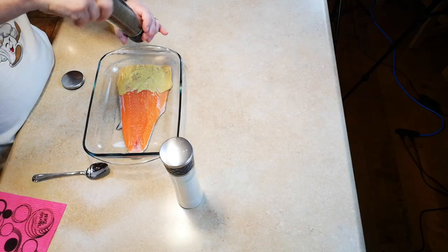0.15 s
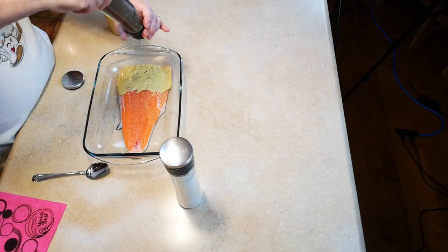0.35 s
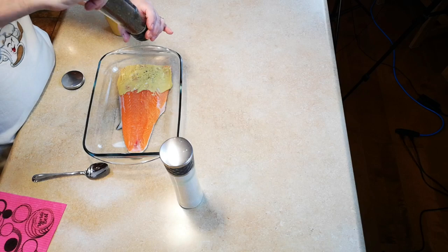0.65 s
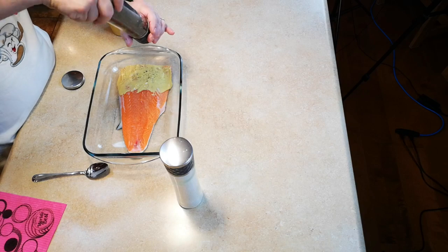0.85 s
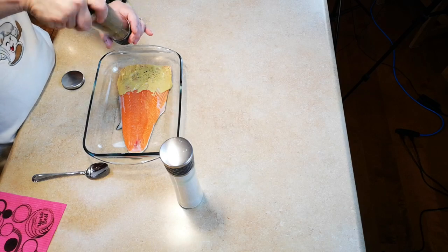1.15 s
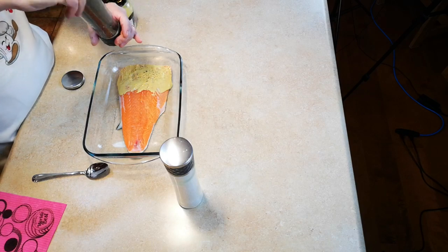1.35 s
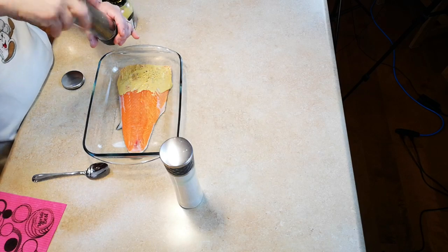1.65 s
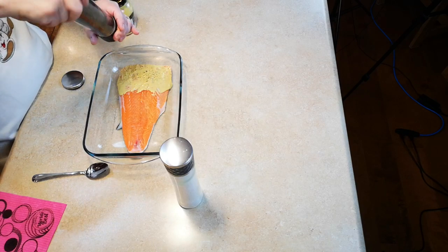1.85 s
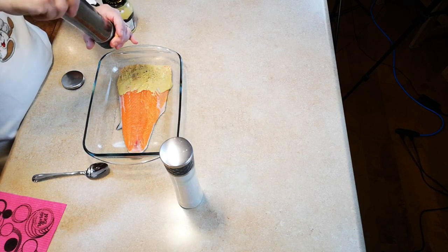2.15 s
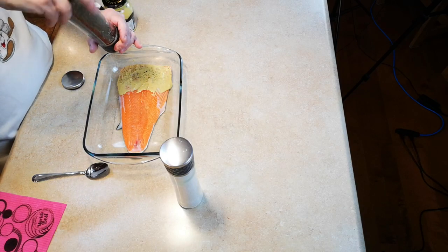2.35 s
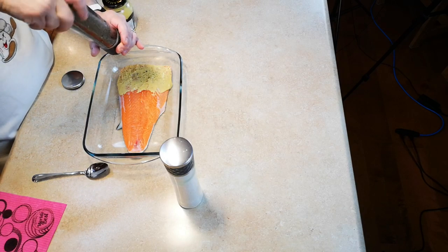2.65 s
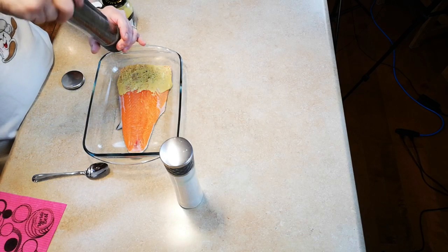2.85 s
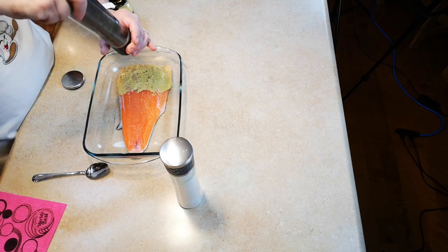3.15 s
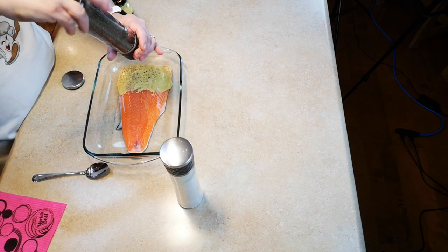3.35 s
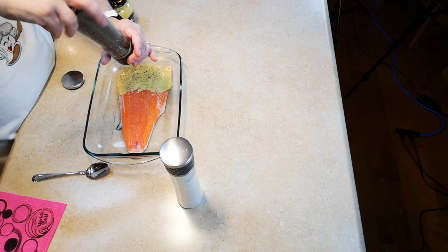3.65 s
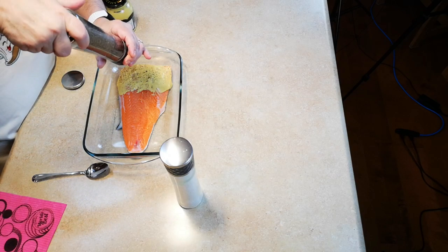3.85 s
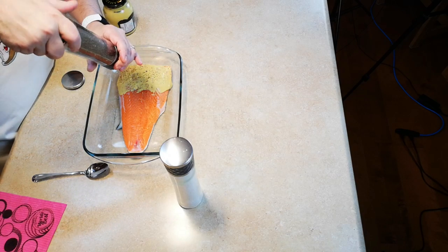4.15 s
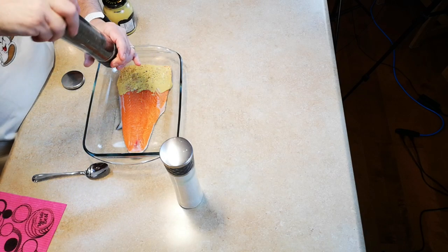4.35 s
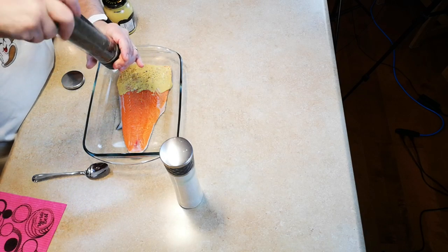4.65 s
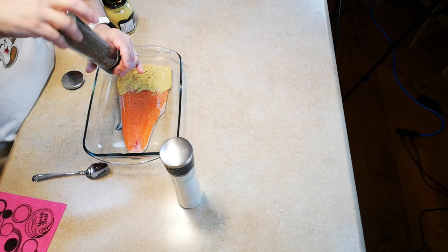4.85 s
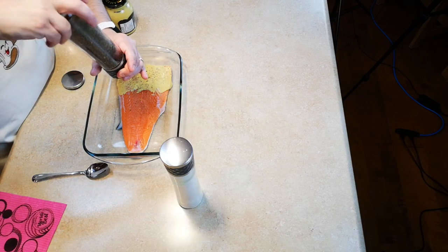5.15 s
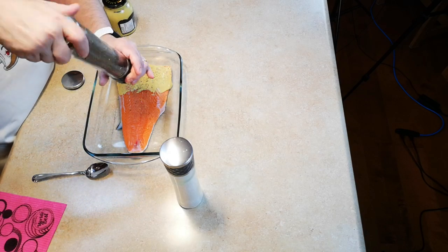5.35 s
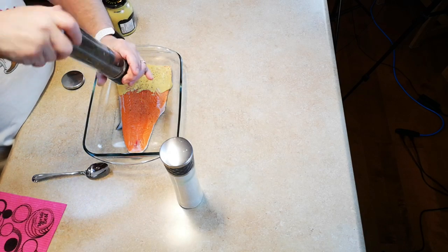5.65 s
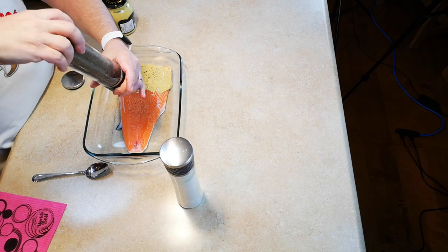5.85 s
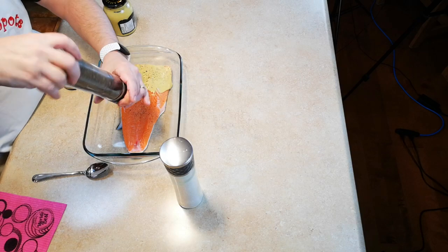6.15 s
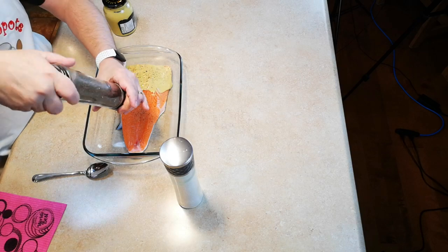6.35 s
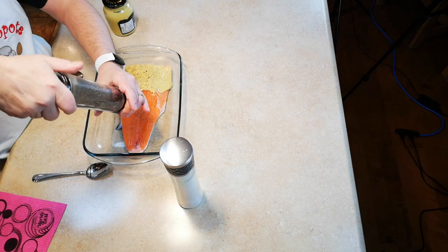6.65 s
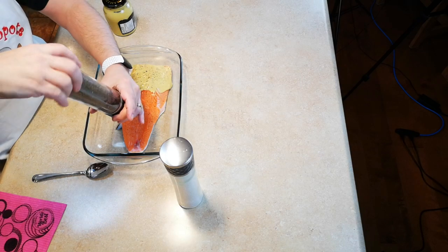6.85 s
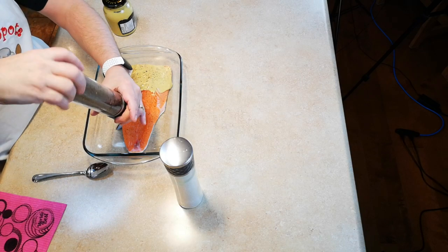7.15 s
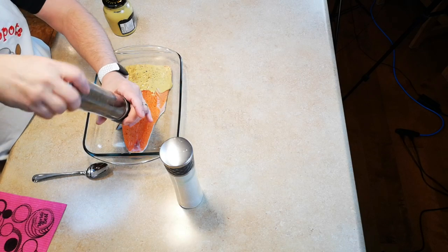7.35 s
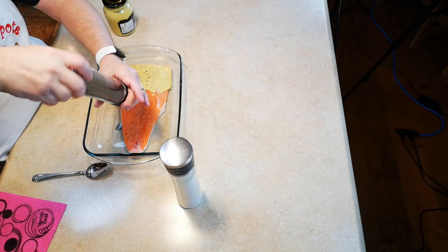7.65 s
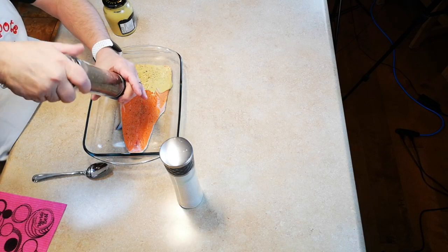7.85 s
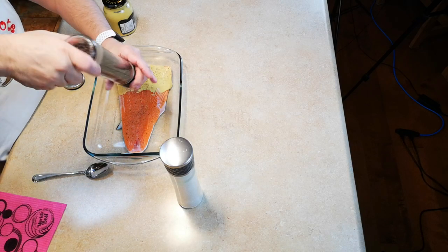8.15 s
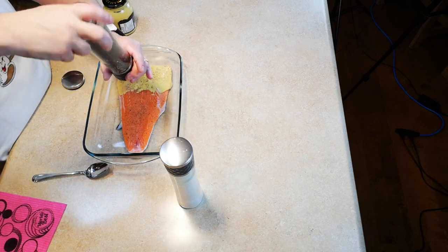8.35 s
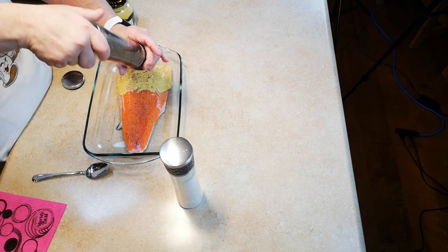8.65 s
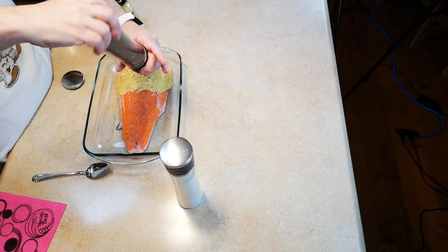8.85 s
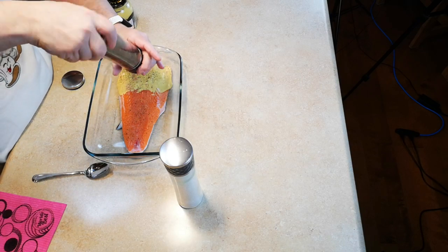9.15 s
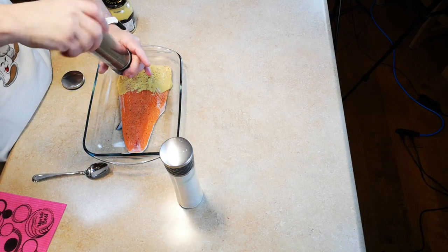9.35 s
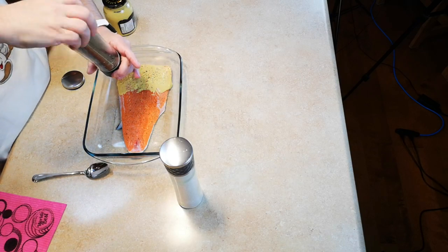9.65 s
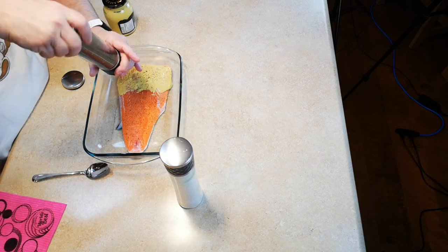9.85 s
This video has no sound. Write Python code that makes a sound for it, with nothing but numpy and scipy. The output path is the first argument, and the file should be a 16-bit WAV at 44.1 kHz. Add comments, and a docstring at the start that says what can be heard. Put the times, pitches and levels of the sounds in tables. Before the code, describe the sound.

Close up in a quiet kitchen, a hand-twisted pepper mill crunches immediately, over a faint deep rumble. From 0 to about 5 seconds short gritty turns, each under a tenth of a second, come nearly three a second, speeding slightly. They crack in a hollow mid-to-high body ring, wrapped in fine bright rattling of loose corns. Faint, tiny shaft squeaks touch 0.3, 1.1 and 3.5 seconds; a hard snap lands at 1.1. From 5 seconds the turns double to about six a second, alternating strong and weak, with strong cracks around 6.3, 6.6 and 7.2 and soft dull hand thumps between 5 and 7.4. Around 8.2 to 8.5 the grinding pauses for a grip shift and small rattle. A very sharp crack at 8.6 restarts it; uneven crunches and thin ticks continue to 10 seconds, with only short, sparse echoes.

```python
"""The burr of a hand-twisted pepper mill crunches at once, over a low kitchen rumble.
Its short turns, about three a second and later about six, are cracks ringing in the mill body.
Loose corns rattle and tick as fine noise grains in a resonant tube; splitting corns are decaying bursts.
The shaft squeaks by stick-slip, the hand now and then thumps, and sparse echoes ring briefly."""
import sys
import numpy as np
from scipy import signal
from scipy.fft import rfft, irfft, next_fast_len
from scipy.io import wavfile
from scipy.ndimage import uniform_filter1d

SR = 44100
rng = np.random.default_rng(int(sys.argv[2]) if len(sys.argv) > 2 else 0)


def to_wav(sig):
    """Store sig (one row per channel, or 1-D mono) as 16-bit WAV at the path in sys.argv[1].

    Samples outside -1..1 are clipped; the rate is SR.
    """
    pcm = np.clip(np.atleast_2d(sig), -1, 1) * 32767
    pcm = np.round(pcm).astype(np.int16)
    wavfile.write(sys.argv[1], SR, pcm.T)  # frames by channels


def invert_db(x):
    """Field ratio 10**(x/20) for x, a level in decibels (scalar or array-like)."""
    u = np.asarray(x, float) / 20
    return 10 ** u


N = 440559  # length in samples

# rumble and air of the kitchen: (frequency [Hz], relative spectral level [dB])
RUMBLE_SPECTRUM = [(2, -2.5), (8, 4.5), (17, -1), (30, -16), (50, -22.5), (150, -26.5), (240, -36.5),
                   (600, -44), (2000, -47.5), (6000, -46), (16000, -54)]
# turns of the burr, forward and back:
# (start [s], length [s], body level at the start [dB], body level at the end [dB], favoured pitch [Hz])
BURR_TURNS = [(0.0, 0.056, -34, -32.5, 3870), (0.367, 0.073, -34, -31, 2920),
              (0.726, 0.065, -44.5, -26, 1390), (1.114, 0.079, -26, -36.5, 4000),
              (1.498, 0.083, -28.5, -34.5, 4920), (1.853, 0.06, -33, -28, 3450),
              (2.199, 0.047, -24, -32.5, 3480), (2.528, 0.066, -31, -24.5, 2550),
              (2.864, 0.082, -31, -32.5, 4130), (3.191, 0.074, -31, -33.5, 2720),
              (3.516, 0.054, -35, -29.5, 2680), (3.811, 0.048, -33.5, -22, 2530),
              (4.108, 0.072, -34.5, -31.5, 4060), (4.409, 0.093, -33.5, -36.5, 1730),
              (4.695, 0.053, -37, -27, 2120), (4.986, 0.017, -27, -31.5, 1070),
              (5.048, 0.0099, -22.5, -34, 2340), (5.284, 0.077, -28.5, -32, 4370),
              (5.482, 0.039, -43.5, -29, 5340), (5.673, 0.061, -28.5, -29, 4970),
              (5.814, 0.076, -42, -29.5, 2390), (5.993, 0.05, -28.5, -29, 3800),
              (6.139, 0.024, -37.5, -26.5, 2320), (6.297, 0.062, -31, -24.5, 1570),
              (6.45, 0.065, -42.5, -39.5, 2400), (6.607, 0.052, -16.5, -25.5, 5270),
              (6.746, 0.047, -41, -41.5, 2450), (6.819, 0.039, -48, -44, 4710),
              (6.923, 0.045, -30, -25, 4350), (7.054, 0.095, -40.5, -46, 4850),
              (7.226, 0.022, -27, -18.5, 4730), (7.365, 0.088, -46, -44, 2150),
              (7.53, 0.063, -26.5, -27.5, 4200), (7.692, 0.13, -42.5, -56, 2050),
              (7.834, 0.063, -27, -40.5, 1130), (7.995, 0.071, -44.5, -47, 1430),
              (8.139, 0.014, -29.5, -36.5, 3980), (8.574, 0.019, -36.5, -53, 4070),
              (8.624, 0.055, -25, -32, 3930), (8.788, 0.092, -55, -40, 3750),
              (9.015, 0.06, -27, -24.5, 3920), (9.181, 0.041, -52, -31, 3400),
              (9.275, 0.035, -47, -42.5, 1140), (9.365, 0.071, -40.5, -25.5, 2060),
              (9.544, 0.069, -52, -39.5, 1230), (9.742, 0.075, -27, -34.5, 3640),
              (9.891, 0.14, -49.5, -42, 1940)]
# resonances of the mill body under the burr: (frequency [Hz], width [Hz], relative level [dB])
BODY_MODES = [(494, 265, -8), (765, 250, -3), (1185, 157, -1), (1725, 820, -5.5), (2505, 630, -2),
              (4110, 380, 1.8), (4830, 1020, -4.5), (7940, 120, -8.5), (13270, 530, -13.5)]
# base level of the rattle under a faint turn, as the mill is tilted and carried: (time [s], level [dB])
LOOSE_CORN_LEVEL = [(0, -46.5), (1, -45.5), (2, -45), (3, -45.5), (4, -42.5), (5, -48.5), (6, -44.5),
                    (7, -44.5), (8, -47.5), (9, -46), (10, -57.5)]
# the hand shifts its grip between turns and the corns slide: (start [s], length [s], base level [dB])
GRIP_SHIFTS = [(0.26, 0.024, -78), (1.04, 0.014, -56.5), (2.468, 0.015, -55), (2.70, 0.14, -54.5),
               (3.143, 0.016, -49.5), (5.367, 0.018, -39), (8.23, 0.01, -43.5), (8.399, 0.06, -43)]
# resonances of the hollow tube under loose corns: (frequency [Hz], width [Hz], relative level [dB])
TUBE_MODES = [(2720, 2000, -5.5), (5100, 1450, -1), (8560, 1020, 2), (10200, 720, -3.5),
              (12700, 1660, -2.5), (14500, 1040, -19.5)]
# decay of the kitchen's echoes: (frequency [Hz], time to fall by 60 dB [s])
KITCHEN_DECAY = [(300, 0.55), (2000, 0.39), (6000, 0.24), (14000, 0.3)]
# peppercorns that split or click: (time [s], peak level [dB], main pitch [Hz])
CORN_SPLITS = [(0.01, -6, 4320), (0.413, -14, 3380), (0.437, -16, 4300), (0.56, -28, 3360),
               (0.754, -18, 3880), (0.797, -17, 1400), (1.109, -1.5, 1220), (1.474, -23, 3780),
               (1.877, -13, 2520), (2.184, -25, 4160), (2.2, -20, 2760), (2.222, -17, 3500),
               (2.525, -19, 2470), (2.838, -27, 4150), (3.254, -14.5, 4120), (3.53, -13, 3120),
               (3.837, -12, 2740), (3.857, -14, 2680), (4.386, -28, 3870), (4.754, -12, 3260),
               (4.995, -17.5, 1150), (5.036, -2, 2160), (5.515, -33, 5460), (5.648, -18, 2600),
               (5.683, -23, 2480), (5.714, -15, 2360), (5.994, -19, 4300), (6.012, -8, 4370),
               (6.3, -11, 2670), (6.304, -6, 3970), (6.335, -22, 3580), (6.355, -5.5, 3860),
               (6.365, -7.5, 2600), (6.464, -26, 3500), (6.508, -31, 2270), (6.597, -6, 4740),
               (6.618, 0, 3940), (6.632, -0.5, 2200), (6.934, -6, 5000), (7.225, -9, 2780),
               (7.234, 0.5, 4130), (7.245, 0.5, 4700), (7.514, -26, 4170), (7.838, -24, 1080),
               (7.879, -17, 2250), (8.146, -22, 2550), (8.363, -40, 1490), (8.601, 2.5, 3900),
               (8.854, -17, 3580), (9.004, -22.5, 3000), (9.016, -8, 4220), (9.191, -23, 3380),
               (9.429, -15, 1840), (9.549, -24, 3950), (9.715, -29, 3360), (9.754, -6, 3430),
               (9.809, -13.5, 4300)]
# the shaft squeaks as it takes load:
# (start [s], length [s], first frequency [Hz], last frequency [Hz], nominal level [dB])
SHAFT_SQUEAKS = [(0.328, 0.036, 638, 450, -53), (1.059, 0.055, 497, 536, -44.5),
                 (3.473, 0.04, 762, 400, -46.5)]
# single loose corns that tick against the tube wall, thin and bright: (time [s], peak level [dB])
CORN_TICKS = [(0.7133, -42), (1.0224, -43), (1.3349, -42), (1.4484, -33), (1.7809, -43), (2.471, -35.5),
              (3.462, -28), (4.12, -19), (4.6942, -50), (5.6735, -24), (5.885, -20), (7.5248, -29),
              (8.126, -26.5), (8.3998, -39), (9.0083, -18), (9.3711, -24), (9.4115, -28)]
# dull thumps through counter and stand: (time [s], peak level [dB])
HAND_THUMPS = [(5.151, -28), (5.427, -29.5), (6.144, -31), (6.484, -38), (7.057, -28.5), (7.340, -35)]


def evened(x):
    """Normalization: scales a signal to an rms of 1."""
    return x / np.sqrt(np.mean(x ** 2) + 1e-20)


def spectrum_at(points, hz):
    """Interpolation: reads a spectrum table on a log-frequency axis."""
    f, value = np.transpose(points)
    return np.interp(np.log(hz + 1), np.log(f + 1), value)


def add(mix, s, sound):
    """Superposition: adds a sound to the mix at time s."""
    part = mix[round(s * SR):][:len(sound)]
    part += sound[:len(part)]


def span(s, length, lead, after):
    """Time base: the first sample around an event, and the times relative to its start."""
    first = max(round((s - lead) * SR), 0)
    last = min(round((s + length + after) * SR), N)
    return first, np.arange(first, last) / SR - s


def ring(x, modes):
    """Modal resonance: parallel band-pass filters, neighbours in opposite sign."""
    out = np.zeros(len(x))
    for k, (hz, width, db) in enumerate(modes):
        b, a = signal.iirpeak(min(hz, .45 * SR), hz / width, SR)
        out += (-1) ** k * invert_db(db) * signal.lfilter(b, a, x)
    return out


def lumps(depth_db, size):
    """Random amplitude modulation: a gain that wanders over about size samples."""
    wander = evened(uniform_filter1d(rng.standard_normal(N), size=size))
    return evened(invert_db(depth_db * wander))


def grit(per_s, spread_db, burst_s, smooth):
    """Granular friction: random short noise bursts over a share of smooth rubbing noise."""
    happens = rng.random(N) < per_s / SR
    size = invert_db(spread_db * np.minimum(rng.exponential(size=N), 3)) * happens
    keep = np.exp(-1 / (burst_s * SR))
    envelope = signal.lfilter([1], [1, -keep], size) + 2.1 * size  # a sharp front
    bursts = evened(envelope * rng.standard_normal(N))
    return np.sqrt(1 - smooth) * bursts + np.sqrt(smooth) * rng.standard_normal(N)


def rumble():
    """Broadband room noise: shaped noise that wavers, strongest below the range of hearing."""
    size = next_fast_len(N)
    hz = np.fft.rfftfreq(size, 1 / SR)
    shaped = rfft(rng.standard_normal(size)) * invert_db(spectrum_at(RUMBLE_SPECTRUM, hz))
    noise = evened(irfft(shaped, size)[:N])
    return invert_db(-37) * lumps(depth_db=2.9, size=5000) * noise


def crunch():
    """Brittle fracture: the burr breaks shell fragments, and each strikes only some body modes."""
    groups = 5
    cracks = [grit(per_s=170, spread_db=2.5, burst_s=0.0014, smooth=0.16) for _ in range(groups)]
    shared = grit(per_s=130, spread_db=3.0, burst_s=0.0017, smooth=0.37)
    body = np.zeros(N)
    for k, crack in enumerate(cracks):
        # the load comes in lumps as corns enter and leave the burr, so the colour keeps shifting
        load = lumps(depth_db=2.5, size=600) * lumps(depth_db=3.0, size=6000)
        body += ring((crack + 0.32 * shared) * load, BODY_MODES[k::groups])
    body = evened(body)

    out, lead, after = np.zeros(N), .02, .12  # margins in s
    for s, length, start_db, end_db, hz in BURR_TURNS:
        first, t = span(s, length, lead, after)
        here = slice(first, first + len(t))
        # the grip bites quickly, moves to its end level, and lets go more slowly
        level_db = np.interp(t, [-lead, 0, length, length + 0.022, length + after],
                             [start_db - 23.5, start_db, end_db, end_db - 15.5, end_db - 43])
        favoured = evened(ring(shared[here], [(hz, 0.22 * hz, 0)]))
        add(out, first / SR, invert_db(level_db) * (body[here] + invert_db(-7.5) * favoured))
    return out


def shakes():
    """Force coupling: each burr turn or grip shift shakes the corns: (start [s], length [s], base level [dB])."""
    early_s, settle_s = 0.011, 0.057  # corns start before the turn bites and outlast it
    shake_share, faint_turn_db = 0.22, -42  # the rattle follows a share of the turn's force
    s, length, start_db, end_db, _ = np.transpose(BURR_TURNS)
    force_db = np.maximum(start_db, end_db) - faint_turn_db
    db = np.interp(s, *np.transpose(LOOSE_CORN_LEVEL)) + shake_share * force_db
    return list(zip(np.maximum(s - early_s, 0), length + settle_s, db)) + GRIP_SHIFTS


def rattle():
    """Granular impact: loose corns and grounds tick brightly in the tube, start with a jolt and settle."""
    power, lead, after = np.zeros(N), .012, .15  # margins in s
    for s, length, db in shakes():
        first, t = span(s, length, lead, after)
        swell_db = np.interp(t, [-lead, 0, length, length + after], [-23, -5.5, -0.5, -23.0])
        add(power, first / SR, invert_db(db + swell_db) ** 2)
    grains = grit(per_s=580, spread_db=0.0, burst_s=0.00013, smooth=0.56)
    heap = np.zeros(N)
    for k, mode in enumerate(TUBE_MODES):
        # the heap moves about, so each resonance swells and fades on its own
        heap += (-1) ** k * lumps(depth_db=2.54, size=1500) * ring(grains, [mode])
    thin = signal.butter(2, 1800, "high", fs=SR, output="sos")  # small grains carry little bass
    return np.sqrt(power) * evened(signal.sosfilt(thin, heap))


def kitchen(x):
    """Reverberation: sparse echoes of random sign, each band dying at its own speed."""
    taps = np.zeros(SR // 2)
    gap = 22  # samples; one echo falls at random in each gap
    at = np.arange(88, len(taps) - gap, gap)
    taps[at + rng.integers(0, gap, size=len(at))] = rng.choice([-1., 1.], size=len(at))
    hz, t, z = signal.stft(taps, SR, nperseg=256)
    decay = invert_db(-60 * t / spectrum_at(KITCHEN_DECAY, hz)[:, None])
    tail = signal.istft(z * decay, SR, nperseg=256)[1]
    return signal.fftconvolve(x, tail / np.linalg.norm(tail))[:N]


def splits():
    """Impulsive excitation: each corn gives way in milliseconds; its place in the burr favours one pitch."""
    out, t = np.zeros(N), np.arange(1300) / SR
    for s, peak_db, hz in CORN_SPLITS:
        # the shell fails at one instant, then crumbles, a big one for longer
        crumble = np.exp(-t / (0.0051 * invert_db(0.39 * peak_db))) + 0.12 * np.exp(-t / 0.011)
        snap = rng.standard_normal(len(t)) * crumble
        snap[0] = 6.6
        # each place excites the modes unevenly; a small corn hardly stirs them
        spot_db = 2.7 * rng.standard_normal(len(BODY_MODES)) + 0.39 * peak_db
        sound = ring(snap, [(f, width, db + d) for (f, width, db), d in zip(BODY_MODES, spot_db)])
        sound += ring(snap, [(hz, 0.34 * hz, 1.5)])
        sound += invert_db(-16.5 + 0.31 * peak_db) * np.diff(snap, prepend=0)  # a big one cracks wide
        add(out, s, invert_db(peak_db) * sound / abs(sound).max())
    return out


def squeaks():
    """Stick-slip: a gliding shaft tone whose partials, the odd ones strong, grow as the load rises."""
    out = np.zeros(N)
    for s, length, first_hz, last_hz, db in SHAFT_SQUEAKS:
        u = np.linspace(0, 1, round(length * SR))
        wobble = 1 + .02 * evened(uniform_filter1d(rng.standard_normal(3000), size=200))[:len(u)]
        phase = 2 * np.pi * np.cumsum(wobble * (first_hz + (last_hz - first_hz) * u)) / SR
        partials = .12 * np.sin(2 * phase) + .8 * np.sin(3 * phase)
        partials += .25 * np.sin(4 * phase) + .7 * np.sin(5 * phase)
        tone = np.sin(phase) + u * partials
        # the grip falters
        catch = 1 + 0.41 * evened(uniform_filter1d(rng.standard_normal(3000), size=120))[:len(u)]
        add(out, s, invert_db(db) * catch * tone * np.sqrt(np.sin(np.pi * u).clip(0)))
    return out


def ticks():
    """Wall impact: a hard little knock of a millisecond or two in the tube, with little bass."""
    out, t = np.zeros(N), np.arange(500) / SR
    thin = signal.butter(2, 5000, "high", fs=SR, output="sos")
    for s, peak_db in CORN_TICKS:
        strike = rng.standard_normal(len(t)) * np.exp(-t / 0.002)
        knock = signal.sosfilt(thin, ring(strike, TUBE_MODES))
        add(out, s, invert_db(peak_db) * knock / abs(knock).max())
    return out


def thumps():
    """Heavily damped oscillation: one soft low cycle for each thump."""
    out, t = np.zeros(N), np.arange(1500) / SR
    push = np.sin(2 * np.pi * 110 * t) * t * np.exp(-t / 0.002)
    for s, peak_db in HAND_THUMPS:
        add(out, s, -invert_db(peak_db) * push / abs(push).max())
    return out


def scene():
    """Superposition of the mill, its echo in the kitchen, thumps and rumble."""
    mill = crunch() + rattle() + splits() + squeaks() + ticks()
    return (mill + invert_db(-11.5) * kitchen(mill) + thumps() + rumble())[None]


def top_cut(x):
    """Nothing passes above the cut-off."""
    return signal.sosfilt(signal.butter(12, 16970, fs=SR, output="sos"), x)


def record(dry):
    """Saturation and band limiting: rounds off the highest peaks and ends steeply at the top."""
    soft = .9 * np.tanh(dry / .9)
    top = signal.ellip(8, .5, 30, 15750, fs=SR, output="sos")  # low-pass: ripple and stop band in dB, edge in Hz
    mix = signal.sosfilt(top, soft)
    return top_cut(mix)


dry = scene()
out = record(dry)
to_wav(out)
```